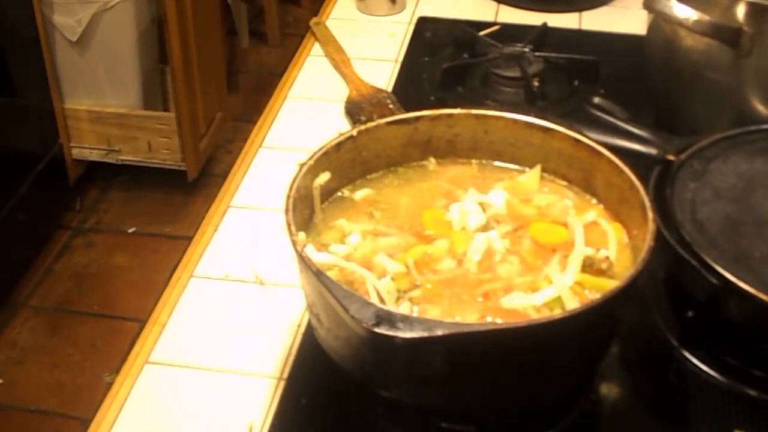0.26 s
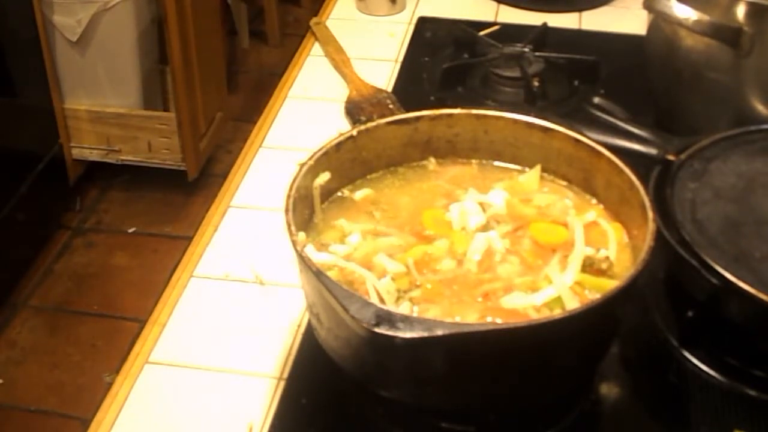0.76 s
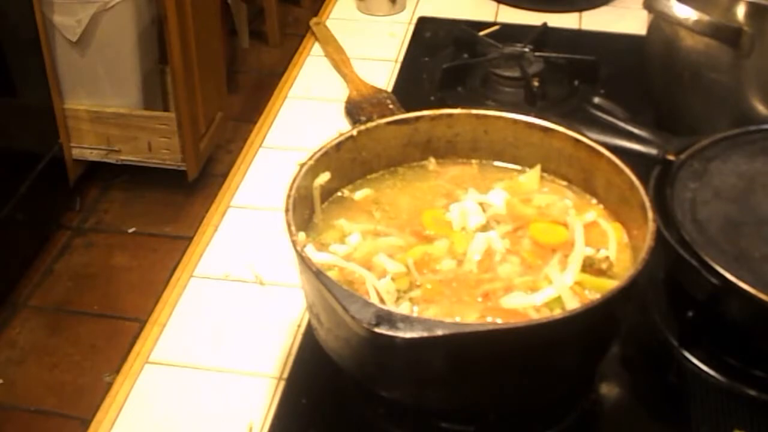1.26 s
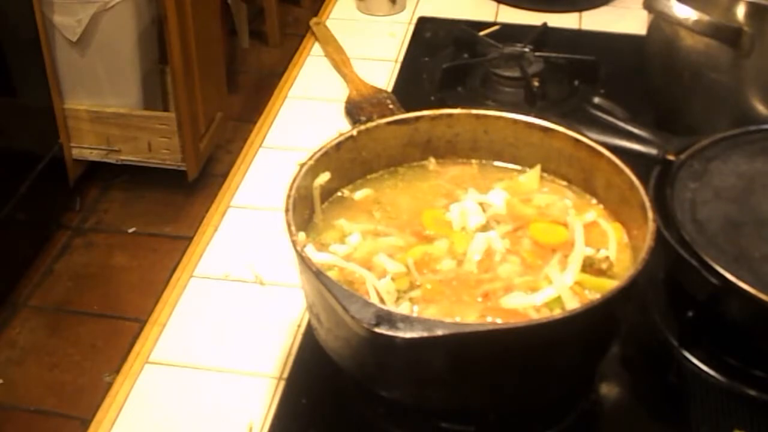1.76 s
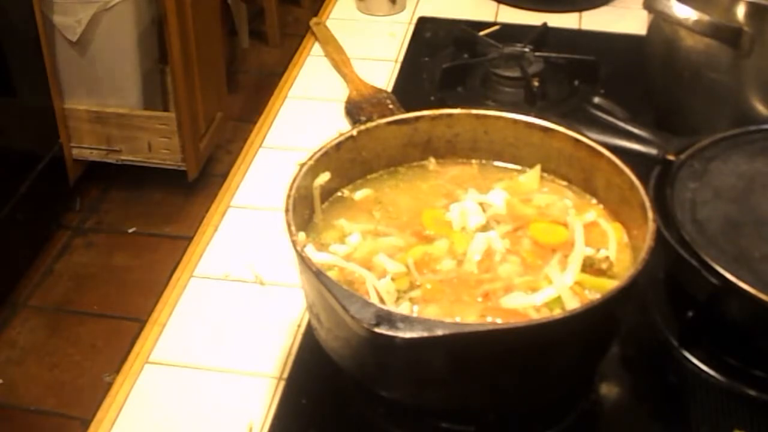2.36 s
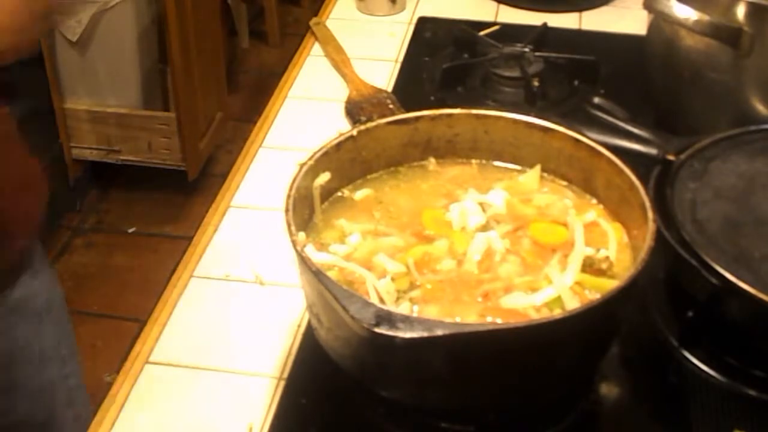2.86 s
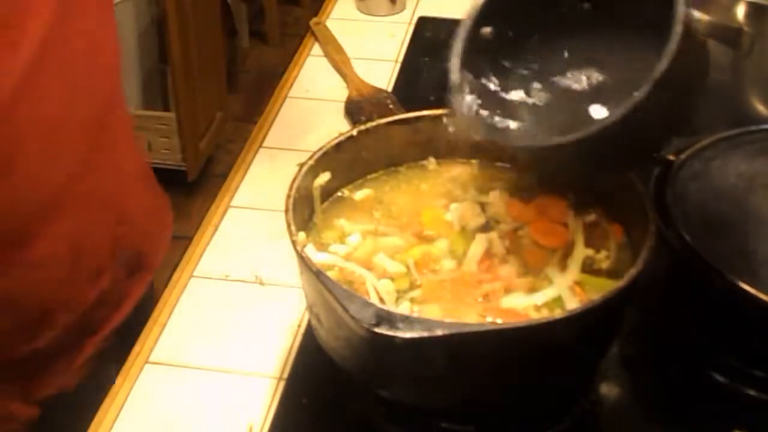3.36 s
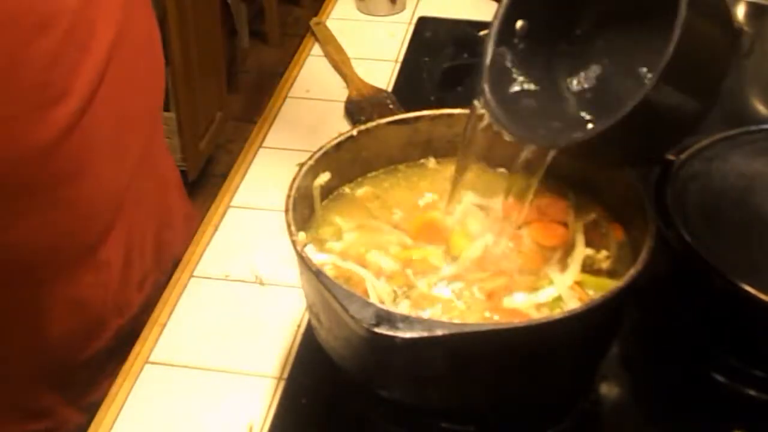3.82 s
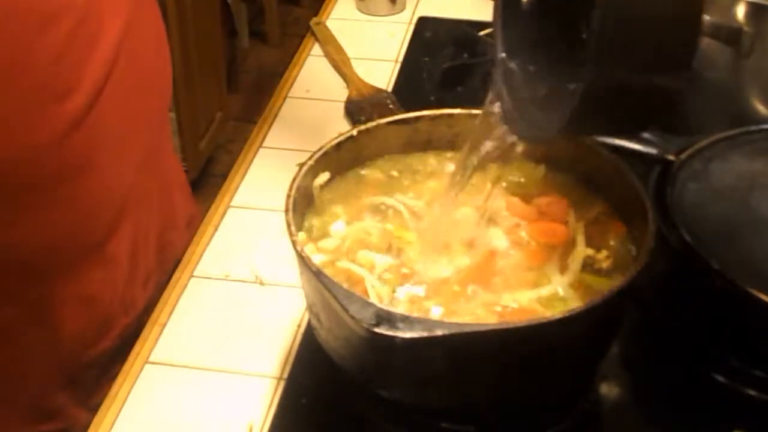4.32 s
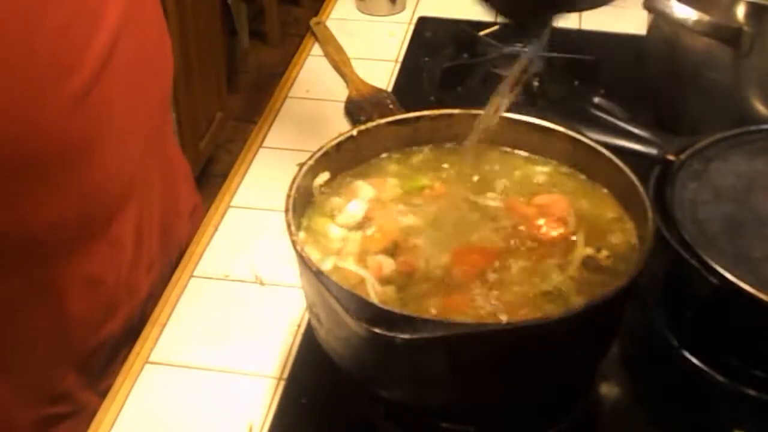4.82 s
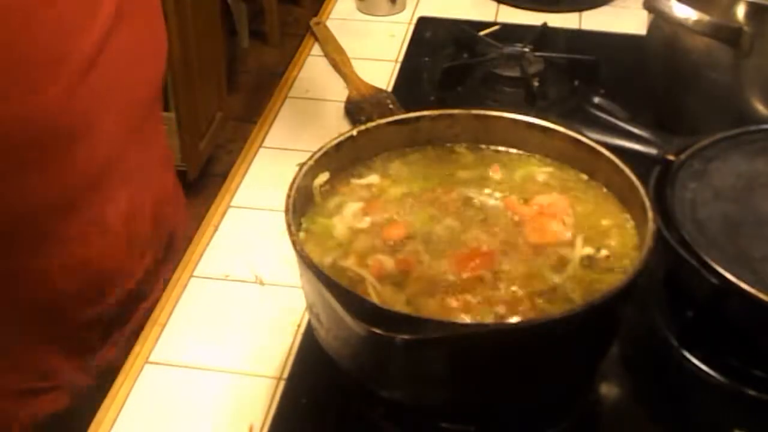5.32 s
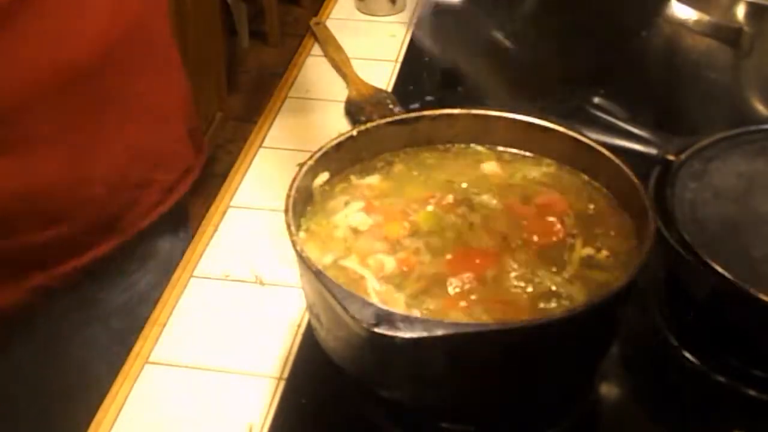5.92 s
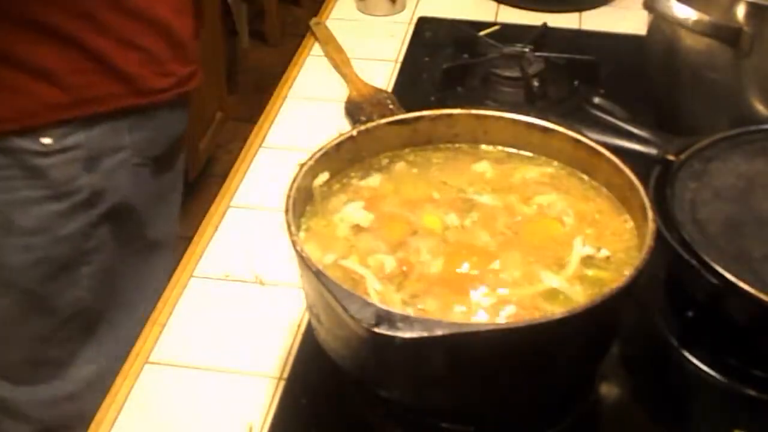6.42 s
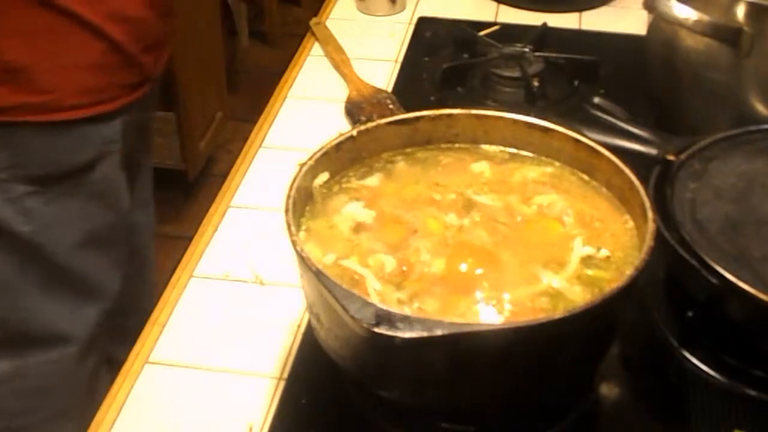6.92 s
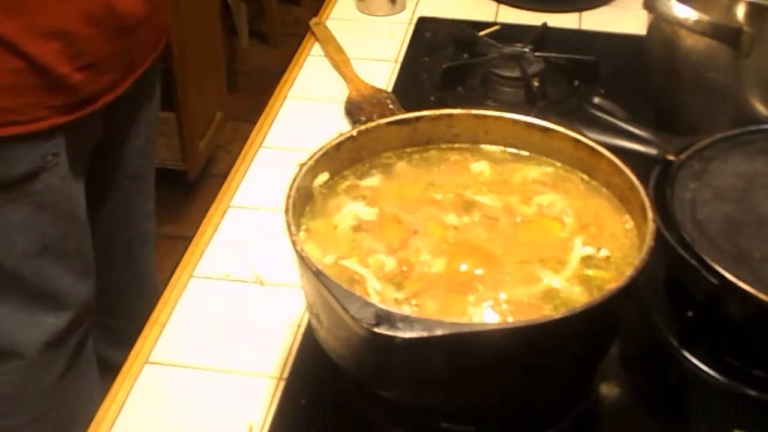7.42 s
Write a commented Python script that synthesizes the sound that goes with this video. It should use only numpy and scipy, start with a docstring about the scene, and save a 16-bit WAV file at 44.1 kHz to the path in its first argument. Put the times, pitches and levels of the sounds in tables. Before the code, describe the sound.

Running tap water spatters in a pan and drums on a sink, a little to the left, then stops. After a few quiet steps and swishes of clothing, water plops and gurgles into a pot of soup right in front of the microphone, followed by drips and a faint sizzle. Clothes rustle again, and the pan lands in the steel sink with several ringing clanks and a short scrape. A low kitchen hush lies underneath.

```python
"""A tiled kitchen, on a pair of small microphones: stove close ahead, sink across the room to the left.
A tap hisses into a saucepan, drums on the sink and is shut off. The cook carries the pan to the stove
and tips it into a pot of soup: trapped air plops and bubbles, spray flies, spilt drops sizzle briefly.
Clothes rustle on the way back, and the empty pan clatters into the steel sink, ringing as it slides.
Underneath lie faint drips from the carried pan and the room tone."""
import sys
import numpy as np
from scipy import signal
from scipy.fft import rfft, irfft
from scipy.io import wavfile
from scipy.ndimage import uniform_filter1d

SR = 44100
rng = np.random.default_rng(int(sys.argv[2]) if len(sys.argv) > 2 else 0)


def pcm_store(signal):
    """Save signal as 16-bit PCM."""
    levels = np.round(np.clip(np.atleast_2d(signal), -1, 1) * 32767)
    wavfile.write(sys.argv[1], SR, levels.astype(np.int16).T)


N = 338688
TIME = np.arange(N) / SR
EDGE_HZ = 16050  # top of the band

# fine droplets, by pitch: f/Hz, level/dB
FINE_DROPLETS = [(5000, -7), (8000, -1.5), (11000, 3.5), (15500, 2)]
# modes of the saucepan: f/Hz, level/dB, t60/s
PAN_MODES = [(400.4, -13, 0.24), (439.6, -25, 0.74), (553, -17, 0.25), (627, -16, 1.2), (688, -14, 0.62),
             (712, -22, 0.37), (825, -6, 0.31), (856, -6, 0.34), (914, 1, 0.082), (951, 13, 0.059),
             (1025, -5.5, 0.46), (1170, -21, 1.9), (1432, -13.5, 0.14), (1559, -16.5, 0.21),
             (1830, -30, 0.16), (2144, -14, 0.17), (2384, -19.5, 0.23)]
# reverberation of the tiled room: f/Hz, t60/s
ROOM_DECAY = [(150, 0.42), (1000, 0.22), (4000, 0.28), (9000, 0.23), (16000, 0.37)]


def pour():
    """Close ahead, the stream slaps the soup, folds air pockets into it and throws off fine spray."""
    # strength of the stream: t/s, level/dB
    stream_curve = [(3.53, -54), (3.58, -38.5), (3.69, -47.5), (3.76, -47), (3.81, -41.5), (4.0, -40),
                    (4.09, -50), (4.17, -43), (4.27, -44.5), (4.44, -35.5), (4.53, -49.5), (4.68, -42),
                    (4.81, -51.5), (4.86, -38.5), (4.96, -41.5), (5.06, -36), (5.11, -50.5), (5.18, -72)]
    # big air pockets, by pitch: f/Hz, level/dB
    big_bubbles = [(300, -31), (480, 2), (700, -5), (1100, 14), (1500, -1.5)]
    # small air pockets, by pitch: f/Hz, level/dB
    small_bubbles = [(1300, 0), (2200, 29), (3200, 27), (4500, 28), (7000, 3)]
    # slaps on the surface, by sharpness: f/Hz, level/dB
    impacts = [(1500, 0), (3000, -3.5), (6000, 3.5), (9000, 0)]
    stream = level(stream_curve)
    gurgle = amp(-20) * swarm(big_bubbles, per_s=620, cycles=4.1, spread_db=0.5, count=14)
    bubbling = amp(-6) * swarm(small_bubbles, per_s=1300, cycles=9.7, spread_db=5)
    slaps = amp(-7) * swarm(impacts, per_s=1400, cycles=1.35, spread_db=7)
    droplets = swarm(FINE_DROPLETS, per_s=1200, cycles=2.8, spread_db=6.5)
    spray = amp(-7.5) * stream * flutter(depth_db=2, rate_hz=20) * droplets
    body = glugs() + stream * (gurgle + bubbling + slaps)
    splash = kitchen(body, wet_db=-5, early_db=-3.5) + kitchen(spray, wet_db=-0.5, early_db=1.5)
    return lean(-0.99) * low_cut(splash, hz=170)


def glugs(rise_s=0.02, pitch_ratio=1.35):
    """The stream drags gulps of air under; each breaks into a cluster of large bubbles."""
    # gulps of air: t/s, level/dB, fade/s, f/Hz
    gulps = [(3.59, -43, 0.086, 1200), (4.0, -51.5, 0.17, 1160), (4.391, -38, 0.055, 760),
             (4.86, -48, .08, 950), (4.94, -47, 0.089, 492), (4.201, -46.5, 0.059, 2390),
             (4.68, -47, 0.14, 2400)]
    out, lead_s = np.zeros((2, N)), 10 * rise_s
    for s, db, fade_s, hz in gulps:
        sizes = [(hz / pitch_ratio, 0), (hz * pitch_ratio, 0)]
        cluster = swarm(sizes, per_s=700, cycles=4.6, spread_db=1.5, count=12, size=SR)
        add(out, s - lead_s, amp(db) * surge(lead_s, rise_s, fade_s)[:SR] * cluster)
    return out


def drops():
    """The first slug of water traps several air pockets and plops; single drops and bubbles stand out."""
    # air pockets of the plop: t/s, level/dB, f/Hz, decay/cycles
    pockets = [(3.5895, -8.5, 1406, 1.5), (3.5898, -11, 900, 1.2), (3.5902, -18, 510, 0.83),
               (3.5897, -23.5, 5100, 7.7), (3.603, -21, 667, 3.1), (3.611, -34, 1070, 4)]
    # single drops and bubbles: t/s, level/dB, f/Hz, decay/cycles
    singles = [(2.838, -49.5, 1910, 10), (2.903, -48, 1450, 9), (2.912, -42, 8100, 11),
               (3.578, -24, 4720, 2.7), (3.64, -26, 2720, 2.2), (3.679, -22, 9200, 4.4),
               (3.8005, -24, 7340, 2.7), (3.8723, -14, 7300, 0.46), (3.933, -23.5, 4700, 0.64),
               (3.9785, -24, 5660, 5), (4.022, -27, 3810, 6.2), (4.1048, -27.5, 6020, 3),
               (4.3085, -28, 1880, 4), (4.445, -21, 5740, 0.8), (4.597, -27, 4100, 2),
               (4.792, -31.5, 1100, 0.7), (4.8755, -33, 2110, 5.8), (5.019, -23.5, 6300, 2.4),
               (5.0445, -28, 3770, 4), (5.052, -17.5, 3987, 2.2), (5.197, -31.5, 1630, 1.3),
               (5.233, -18.5, 11900, 0.62), (5.233, -31, 3400, 1.7), (5.3675, -33, 8100, 5.5),
               (5.5035, -26, 12800, 3), (5.6085, -31.5, 4670, 8.4), (5.7615, -36.5, 7700, 3)]
    plop = kitchen(bubbles(pockets), wet_db=-2, early_db=-3)
    drips = kitchen(low_cut(bubbles(singles), hz=300), wet_db=-2, early_db=0, early_s=0.011)
    return lean(0.56) * plop + lean(-0.89) * drips


def tap(shut_s=1.78, closing_s=0.14, slacken_s=1.536):
    """Across the room, the aerated jet spatters in the pan and drums on the sink, heard mostly as echo."""
    # spectrum of the spatter: f/Hz, level/dB
    spatter = [(60, -37), (140, -51), (250, -15), (380, -14), (520, -8.5), (850, -6), (1200, -8),
               (2100, -5.5), (3700, -6), (6500, -1), (8400, 2), (10200, 3), (11500, -1), (16000, -1.5)]
    # modes of sink and pan under the jet: f/Hz, level/dB, t60/s
    sink_modes = [(209, -5.5, 1), (381, -4.5, 0.19), (801, 4.5, 0.09), (944, 13.5, 0.046)]
    valve = np.clip((shut_s - TIME) / closing_s, 0, 1)
    flow = np.maximum(valve, amp(-20) * fading(shut_s, fade_s=0.09))  # the last water trickles away
    # the jet drums harder for a moment as it starts to slacken
    force = amp(-52.5) * fading(shut_s, fade_s=0.082) + amp(-49) * surge(slacken_s, 0.033, 0.033)
    room_paths = dying(diffuse(rng.standard_normal((2, SR // 2))), ROOM_DECAY)
    far = driven(clicks(per_s=5000, spread_db=5.5), room_paths)
    near = unit(diffuse(np.array([clicks(per_s=2500, spread_db=-1.5) for _ in range(2)])))
    hiss = amp(-30) * flow * colour(far + amp(-5) * near, spatter)
    drum = force * driven(clicks(per_s=400, spread_db=1.5), ring(sink_modes, lowest_hz=205))
    return lean(2.7) * (hiss + drum)


def clatter():
    """Each knock in the sink rings the pan, booms in the steel basin and sets off a dense bright clank."""
    # knocks of the pan: t/s, ring level/dB, boom level/dB, clank level/dB
    knocks = [(7.173, -39, -18, -30.5), (7.1748, -8.5, -18, -42), (7.185, -22, -18.5, -27),
              (7.2025, -14.5, -18, -29), (7.2163, -21.5, -25.5, -50), (7.322, -28, -38, -70),
              (7.346, -31.5, -44, -72), (7.4485, -41, -39, -20), (7.455, -37, -36, -20.5),
              (7.47, -48.5, -28.5, -29), (7.511, -38, -24, -55), (7.548, -52, -50, -60)]
    # the rim's bright modes, set off by metal on metal: f/Hz, level/dB, t60/s
    rim_modes = [(1810, 2.5, 0.1), (2750, 1.5, 0.086), (3340, 2.5, 0.25), (3370, 1, 0.32), (4253, 6, 0.19),
                 (5200, 8, 0.1), (5739, -2, .16), (6570, 5.5, 0.13), (8900, -5, 0.15)]
    # spectrum of the basin's boom: f/Hz, level/dB
    basin = [(60, -64), (150, -58), (205, -16), (300, -16.5), (420, -7), (520, -11), (680, 0), (980, -6.5),
             (1200, -15), (1500, -18), (2800, -14.5), (5000, -26), (11000, -63)]
    # spectrum of the clank: f/Hz, level/dB
    metal = [(60, -60), (150, -54), (210, -14), (340, 2.5), (530, 2), (850, -4.5), (2000, -8), (3400, -5),
             (4600, -7.5), (5400, -3), (8600, -6.5), (11500, -14), (16000, -20)]
    out = np.zeros((2, N))
    pan, rim = struck(PAN_MODES, contact_s=0.0033), struck(rim_modes, contact_s=0.0017)
    swell = 1 - np.exp(-TIME[:SR] / 0.00074)  # the wide basin takes a moment to respond
    for s, ring_db, boom_db, clank_db in knocks:
        boom = narrowed(noise(basin, size=SR), side_db=-7.5)
        boom = swell * dying(boom, t60s=[(200, 0.31), (900, 0.38), (3000, 0.3)])
        clank = dying(noise(metal, size=SR), t60s=[(400, 0.33), (3300, 0.3), (8000, 0.27), (15000, 0.2)])
        clank = lean(0.5) * (clank + amp(-4) * rim)
        add(out, s, amp(ring_db) * pan + amp(boom_db) * boom + amp(clank_db) * clank)
    return lean(0.2) * low_cut(out, hz=130)


def slide():
    """The pan's base catches and slips on the steel basin, which keeps it ringing."""
    # strength of the slide: t/s, level/dB
    slide_curve = [(7.59, -51), (7.63, -45.5), (7.65, -33), (7.668, -29.5), (7.68, -23)]
    # spectrum of the scrape: f/Hz, level/dB
    scrape = [(100, -57), (370, -5), (630, 3), (820, -41), (1200, -8), (2800, -4.5), (4500, -15.5),
              (6150, -4.5), (7000, -11), (12000, -19), (16000, -30)]
    slips = clicks(per_s=900, spread_db=3)
    return level(slide_curve) * (noise(scrape) + amp(-10) * driven(slips, ring(PAN_MODES)))


def sizzle(spill_s=5.06):
    """Close by, spilt droplets burst on hot metal in tiny high ticks; twice the stove hisses thinly."""
    # bursting droplets, by pitch: f/Hz, level/dB
    frying = [(5000, -22), (8000, -20), (11000, -20), (15500, -5)]
    # hisses from the stove: start t/s, end t/s, level/dB
    hisses = [(2.33, 2.52, -53), (5.93, 6.08, -54)]
    # spectrum of those hisses: f/Hz, level/dB
    thin_hiss = [(13500, -42), (14700, -5), (15200, 3), (16000, -11)]
    boiling = amp(-50) * held(spill_s, end_s=5.62)
    lingering = amp(-63) * held(spill_s, end_s=6.08)
    bursts = swarm(frying, per_s=900, cycles=1.15, spread_db=7)
    ticks = low_cut((boiling + lingering) * bursts, hz=2500)
    hiss = sum(amp(db) * held(start_s, end_s) for start_s, end_s, db in hisses) * noise(thin_hiss)
    return lean(-1.2) * kitchen(ticks, wet_db=-1, early_db=-3) + hiss


def cook(thump_s=0.033, scuff_s=0.037):
    """Between sink and stove, clothes swish; each foot thumps softly and its sole scuffs the tiles."""
    # swishes of clothing: peak t/s, level/dB, rise/s, tilt/(dB per octave), hollowness/0-1
    swishes = [(2.125, -48, 0.09, 6.5, 0), (2.27, -49.5, 0.069, 5.5, 0.2), (2.67, -46, 0.26, 4.5, 0),
               (3.33, -57, 0.08, 5, 0), (6.46, -47.5, 0.29, 1, 0.75), (6.57, -40, 0.11, 1.8, 0.87)]
    # footfalls: t/s, thump level/dB, scuff level/dB
    steps = [(1.94, -64, -65), (2.299, -59, -75), (2.391, -58, -78), (2.744, -52, -61), (3.21, -55.5, -61),
             (5.979, -54, -75), (6.135, -51, -66), (6.208, -53.5, -60), (6.32, -53, -67), (6.774, -53, -43)]
    # spectrum of a foot's thump: f/Hz, level/dB
    thump = [(50, -16), (130, -11.5), (300, 1), (520, 4.5), (900, -1.5), (3000, -22)]
    # spectrum of a sole's scuff: f/Hz, level/dB
    scuff = [(350, -47), (600, -4), (821, -5), (1170, -7), (1520, 4.5), (2380, -2), (3180, 4.5),
             (4510, -14.5), (12000, -55), (15600, -64), (22000, -120)]
    out = np.zeros((2, N))
    for s, db, rise_s, tilt_db, hollow in swishes:
        out += amp(db) * surge(s, rise_s, fade_s=0.53 * rise_s) * rubbing(tilt_db, hollow)
    t = TIME[:SR // 2]
    thump_shape = 2 * (1 - np.exp(-t / 0.0052)) * np.exp(-t / thump_s)
    scuff_shape = t / scuff_s * np.exp(1 - t / scuff_s)
    for s, thump_db, scuff_db in steps:
        add(out, s, amp(thump_db) * noise(thump, size=len(t)) * thump_shape)
        add(out, s, amp(scuff_db) * noise(scuff, size=len(t)) * scuff_shape)
    return out


def rubbing(tilt_db, hollow):
    """Cloth rubs with small catches; tilt_db per octave brightens it, resonances make it hollow; rms 1."""
    # spectrum of rubbing cloth: f/Hz, level/dB
    cloth = [(180, -30), (400, -1.5), (750, -5.5), (1500, -5), (3500, -9), (6500, -14), (11000, -17),
             (16000, -23.5)]
    # resonances of a hollow rub: f/Hz, width/Hz, level/dB
    resonances = [(1490, 220, 2), (2100, 180, 8), (3530, 350, 8), (5200, 2100, 6.5)]
    hz = np.geomspace(100, EDGE_HZ, num=400)
    db = read(cloth, hz) + tilt_db * np.log2(hz)
    for centre, width, peak_db in resonances:
        db += hollow * peak_db / (1 + (2 * (hz - centre) / width) ** 2)
    catches = unit(np.array([clicks(per_s=1500, spread_db=2) for _ in range(2)]))
    friction = diffuse(rng.standard_normal((2, N)) + amp(-11) * catches)
    return colour(friction, np.transpose([hz, db]))


def stray_drips():
    """Sparse faint drips tick while the pan is carried to the stove and back."""
    drips = swarm(FINE_DROPLETS, per_s=45, cycles=3, spread_db=3, count=10)
    gain = amp(-66.5) * held(start_s=2.2, end_s=6.88, rise_s=0.18, fade_s=0.092)
    return kitchen(gain * drips, wet_db=-1, early_db=-3)


def room_tone():
    """The steady hush of the kitchen, with a faint drone and a thin hiss high up."""
    # spectrum of the hush: f/Hz, level/dB
    hush = [(30, -42), (100, -32), (200, -11), (360, -3.5), (550, -6), (1000, -7), (2000, -11),
            (4400, -13.5), (11000, -15.5), (16000, -14.5)]
    # spectrum of the drone: f/Hz, level/dB
    drone = [(200, -48), (342, -28), (355, -2.5), (368, -23), (410, -21), (421, -5), (435, -22),
             (700, -42.5)]
    # spectrum of the thin hiss: f/Hz, level/dB
    whine = [(11500, -40), (12900, -7), (13450, 8), (14000, -23), (15500, -46)]
    return amp(-53) * noise(hush) + amp(-65) * noise(drone) + amp(-64) * noise(whine)


def kitchen(x, wet_db, early_db, early_s=0.0073):
    """Direct sound, quick echoes off pot wall and counter, and the tail of the tiled room."""
    t = TIME[:SR // 2]
    early, late = (diffuse(rng.standard_normal((2, len(t)))) for _ in range(2))
    early = early * np.exp(-t / early_s) * (t > 0.001)
    late = dying(late, ROOM_DECAY) * (1 - np.exp(-t / 0.0082))
    echoes = amp(early_db) * early / np.linalg.norm(early[0]) + amp(wet_db) * late / np.linalg.norm(late[0])
    return x + signal.fftconvolve(x, echoes, axes=1)[:, :N]


def bubble(hz, cycles, rise=0.018):
    """A trapped air pocket rings and rises in pitch as it nears the surface; peak 1."""
    turns = hz * TIME[:int(6 * cycles * SR / hz) + 8]
    age = turns / cycles
    flow = (1 - np.exp(-2 * turns)) * np.exp(-age) * np.sin(2 * np.pi * turns * (1 + rise * age))
    pressure = np.gradient(flow)  # only the change of flow radiates
    return pressure / np.abs(pressure).max()


def bubbles(rows):
    """Single bubbles, each ringing at its own time."""
    out = np.zeros((2, N))
    for s, db, hz, cycles in rows:
        add(out, s, amp(db) * bubble(hz, cycles))
    return out


def swarm(sizes, per_s, cycles, spread_db, count=28, size=N):
    """Bubbles of many sizes burst at random, each size from its own direction; rms 1."""
    out = np.zeros((2, size))
    for hz in np.geomspace(sizes[0][0], sizes[-1][0], count):
        grain = bubble(hz * rng.uniform(0.98, 1.02), cycles * rng.uniform(0.5, 1.5))
        grain = grain / np.linalg.norm(grain) * amp(read(sizes, hz))
        direction = lean(2 * rng.standard_normal())
        out += direction * signal.oaconvolve(clicks(per_s / count, spread_db, size), grain)[:size]
    return unit(out)


def ring(modes, lowest_hz=280):
    """A body rings as a sum of dying sines; it is too small to radiate deep bass."""
    t = TIME[:SR]
    modal = sum(amp(db - 60 * t / t60) * np.sin(2 * np.pi * hz * t) for hz, db, t60 in modes)
    return low_cut(modal, lowest_hz, order=4)


def struck(modes, contact_s):
    """One ring of a body, building up during the contact; rms 1 over its first 10 ms."""
    sound = ring(modes) * (1 - np.exp(-(TIME[:SR] / contact_s) ** 2))
    return sound / np.sqrt(np.mean(sound[:SR // 100] ** 2))


def driven(drive, response):
    """A body or room already sounding under a steady drive; rms 1."""
    return unit(irfft(rfft(drive) * rfft(response, N), N))


def clicks(per_s, spread_db, size=N):
    """Random impulses whose heights scatter by spread_db."""
    chance, height, sign = rng.random((3, size))
    excess = np.minimum(-np.log(1 - height), 4)
    return (chance < per_s / SR) * amp(spread_db * excess) * np.sign(sign - 0.5)


def noise(spectrum, size=N):
    """Diffuse stereo noise of a given colour."""
    return colour(diffuse(rng.standard_normal((2, size))), spectrum)


def diffuse(pair):
    """Two unrelated signals become a diffuse field: alike in the bass, unrelated in the treble."""
    # likeness of diffuse sound at the two microphones: f/Hz, coherence/0-1
    coherence = [(100, 0.62), (700, 0.72), (1400, 0.84), (3000, 0.23), (6000, 0.02)]
    size = pair.shape[-1]
    left, other = rfft(pair)
    same = read(coherence, np.fft.rfftfreq(size, 1 / SR))
    return irfft(np.array([left, same * left + np.sqrt(1 - same ** 2) * other]), size)


def colour(x, spectrum):
    """Gives x a spectrum, at rms 1."""
    size = x.shape[-1]
    return unit(irfft(rfft(x) * amp(read(spectrum, np.fft.rfftfreq(size, 1 / SR))), size))


def dying(x, t60s):
    """Each band of x dies at its own speed; t60s lists f/Hz, t60/s."""
    hz, t, bands = signal.stft(x, SR, nperseg=256)
    decay = amp(-60 * t / read(t60s, hz)[:, None])
    return signal.istft(bands * decay, SR, nperseg=256)[1][:, :x.shape[-1]]


def low_cut(x, hz, order=2):
    """Rolls off the bass below hz."""
    return signal.sosfilt(signal.butter(order, hz, "highpass", fs=SR, output="sos"), x)


def level(rows):
    """Gain over time from a dB curve, silent outside it."""
    s, db = np.transpose(rows)
    inside = (TIME >= s[0]) & (TIME <= s[-1])
    return amp(np.interp(TIME, s, db)) * uniform_filter1d(inside * 1., size=600)


def held(start_s, end_s, rise_s=0.035, fade_s=0.05):
    """Gain that rises, holds until end_s and dies away."""
    return np.clip((TIME - start_s) / rise_s, 0, 1) * fading(end_s, fade_s)


def surge(peak_s, rise_s, fade_s):
    """Gain that builds up to 1 at peak_s and dies away."""
    return np.exp(-np.maximum(peak_s - TIME, 0) / rise_s) * fading(peak_s, fade_s)


def fading(end_s, fade_s):
    """Gain of 1 that dies away after end_s."""
    return np.exp(-np.maximum(TIME - end_s, 0) / fade_s)


def flutter(depth_db, rate_hz):
    """Gain that wanders at random."""
    knots = rng.standard_normal(200)
    return amp(depth_db * np.interp(TIME * rate_hz, np.arange(len(knots)), knots))


def lean(left_db):
    """Channel gains that put the left microphone left_db above the right."""
    return amp([[left_db / 2], [-left_db / 2]])


def from_left(pair, lead_s=8e-5):
    """Sound from the sink side of the room reaches the left microphone first."""
    return np.array([pair[0], np.pad(pair[1], (round(lead_s * SR), 0))[:N]])


def narrowed(pair, side_db):
    """Narrows the stereo image."""
    mid = pair.mean(axis=0)
    return mid + amp(side_db) * (pair - mid)


def add(mix, s, sound):
    """Mixes a sound in at time s."""
    part = mix[..., max(round(s * SR), 0):][..., :sound.shape[-1]]
    part += sound[..., :part.shape[-1]]


def read(points, hz):
    """Reads a table on a log-frequency axis."""
    f, value = np.transpose(points)
    return np.interp(np.log(hz + 1), np.log(f + 1), value)


def amp(db):
    """Decibels to gain."""
    return 10 ** (np.asarray(db) / 20)


def unit(x):
    """Scales to rms 1."""
    return x / np.sqrt(np.mean(x ** 2) + 1e-20)


def scene():
    """The stove is close ahead of the microphones; the sink and the cook's path lie to the left."""
    ahead = pour() + drops() + sizzle() + stray_drips()
    sink_side = tap() + clatter() + slide() + lean(0.94) * (cook() + room_tone())
    return ahead + from_left(sink_side)


def record(dry):
    """The small microphones lose the deep bass, and the treble ends at EDGE_HZ."""
    band_limit = signal.firwin(511, EDGE_HZ, window=("kaiser", 9), fs=SR)
    return signal.oaconvolve(low_cut(dry, hz=110), band_limit[None], "same")


dry = scene()
out = record(dry)
pcm_store(out)
```